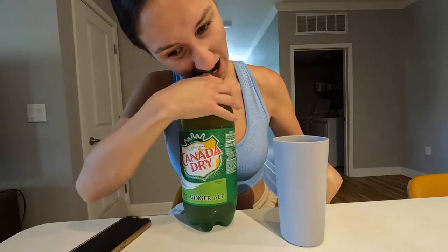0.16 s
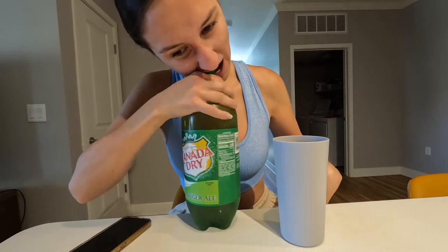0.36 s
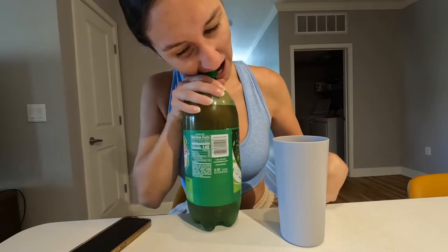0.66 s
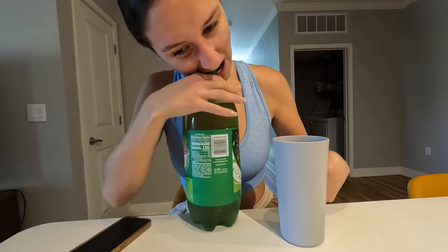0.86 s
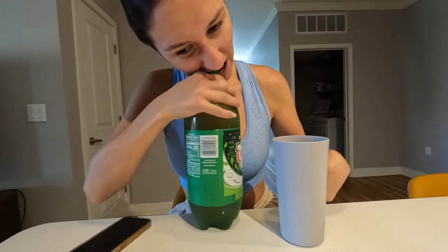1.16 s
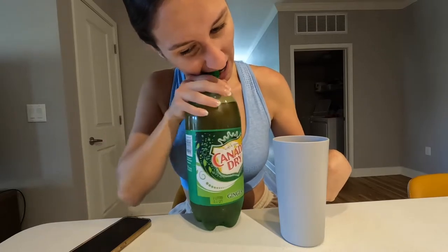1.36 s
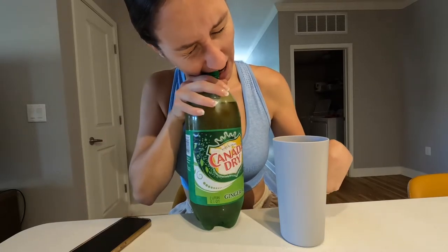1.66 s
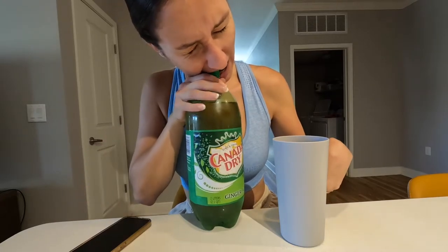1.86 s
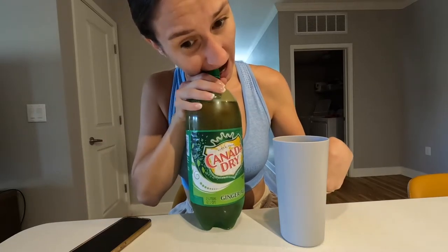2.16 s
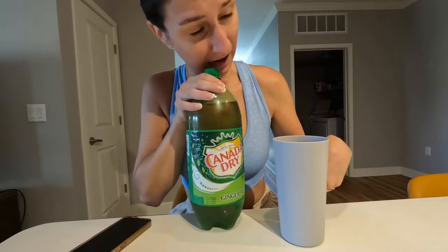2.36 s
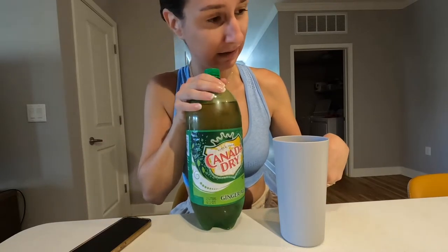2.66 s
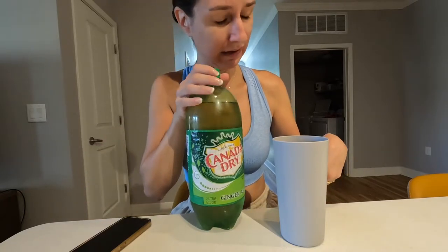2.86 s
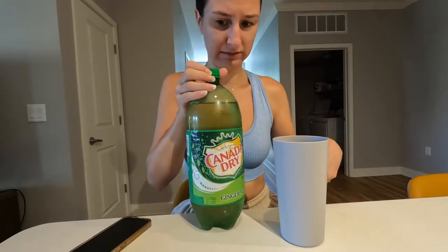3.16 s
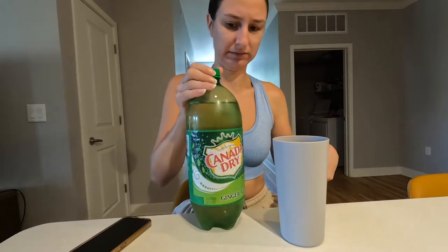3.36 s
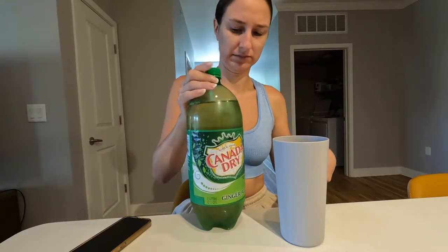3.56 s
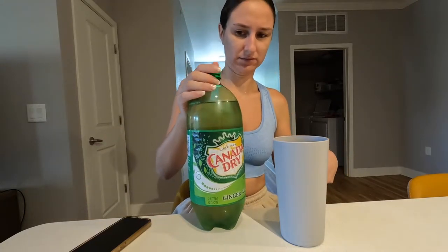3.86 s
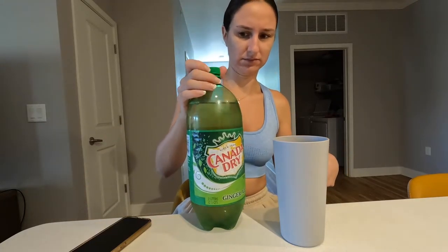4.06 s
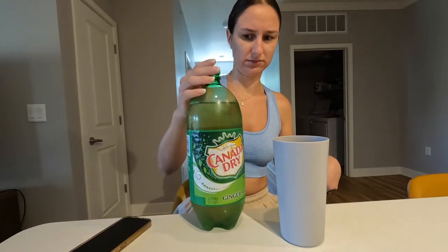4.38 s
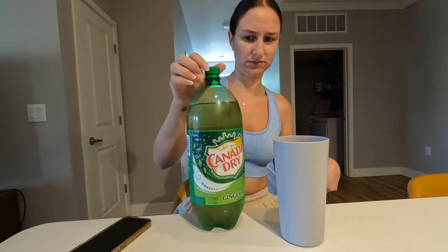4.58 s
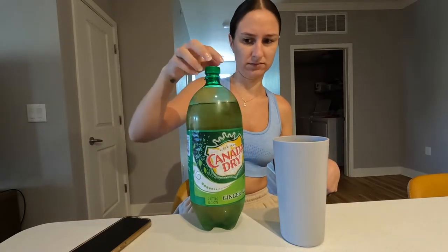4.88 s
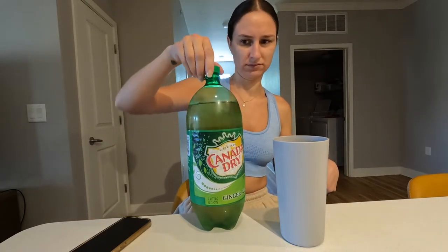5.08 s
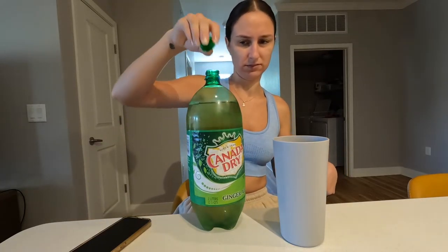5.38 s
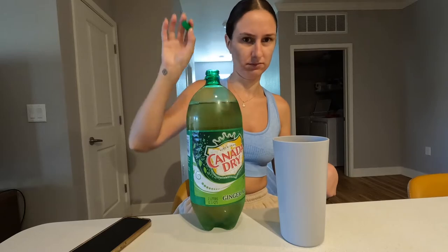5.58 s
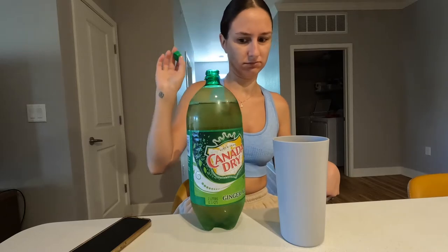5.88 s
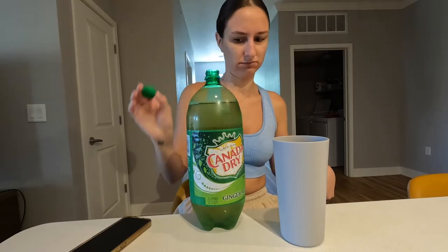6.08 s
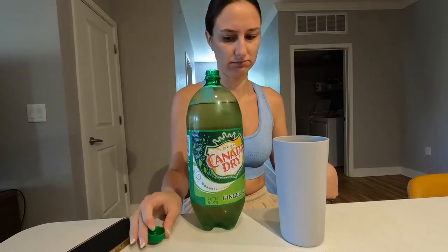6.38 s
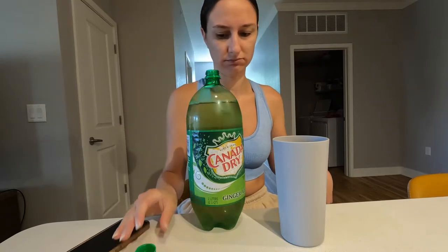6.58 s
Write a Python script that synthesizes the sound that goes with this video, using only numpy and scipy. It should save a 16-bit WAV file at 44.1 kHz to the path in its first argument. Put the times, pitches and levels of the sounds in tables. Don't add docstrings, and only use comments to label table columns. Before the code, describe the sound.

A plastic soda bottle cap cracks and gas hisses out in a loud bright burst, then a small puff, cap clicks and a table tap.

```python
import sys
import numpy as np
from scipy import signal
from scipy.fft import rfft, irfft
from scipy.io import wavfile
from scipy.ndimage import uniform_filter1d

SR = 44100
rng = np.random.default_rng(int(sys.argv[2]) if len(sys.argv) > 2 else 0)


def voltage_ratio(decibels):
    exponent = np.asarray(decibels, float) / 20
    return 10 ** exponent


def file_out(sig):
    cols = np.atleast_2d(sig).T
    lim = np.clip(cols, -1, 1)
    pcm = np.round(lim * 32767).astype(np.int16)
    wavfile.write(sys.argv[1], SR, pcm)


N = 296793


def unit(x):
    return x / np.sqrt(np.mean(x ** 2))


def noise():
    return rng.standard_normal(N)


def band(x, hz, width):
    return signal.lfilter(*signal.iirpeak(min(hz, .45 * SR), hz / width, fs=SR), x)


def steep_band(x, hz, width):
    return band(band(x, hz, width), hz, 2 * width)


def body(x, modes):
    out = np.zeros(N)
    for k, (hz, width, db) in enumerate(modes):
        out += (-1) ** k * voltage_ratio(db) * unit(steep_band(x, hz, width))
    return unit(out)


def colour(x, table):
    hz, db = np.transpose(table)
    f = np.maximum(np.arange(len(x) // 2 + 1) * SR / len(x), 1)
    return irfft(rfft(x) * voltage_ratio(np.interp(np.log(f), np.log(hz), db)), len(x))


def walk(rate):
    k = int(SR / rate)
    held = np.repeat(rng.standard_normal(N // k + 1), k)
    return unit(uniform_filter1d(uniform_filter1d(held, k), k)[:N])


def curves(*tables):
    t = np.arange(N) / SR
    s, *columns = np.vstack(tables).T
    on = sum((t >= rows[0][0]) & (t <= rows[-1][0]) for rows in tables)
    first, *rest = (np.interp(t, s, c) for c in columns)
    return [voltage_ratio(first) * uniform_filter1d(1. * on, size=200)] + rest


def swell(s, rise, fall, db):
    out = np.zeros(N)
    i = np.arange(max(int((s - 2 * rise) * SR), 0), min(int((s + 2 * fall) * SR), N))
    distance = np.maximum((s - i / SR) / rise, (i / SR - s) / fall)
    out[i] = voltage_ratio(db - 18.5 * distance)
    return out


def ring(hz, t60, burst_s, seed):
    t = np.arange(len(seed)) / SR
    contact = np.exp(-t / burst_s) * (seed + 1.4 * (t == 0))
    x = band(band(contact, hz, np.log(1000) / (np.pi * t60)), hz, 0.59 * hz)
    if hz < SR / 8:
        x = signal.lfilter([1, 2, 1], [1], x)
    return x / np.abs(x).max()


def add(out, s, x):
    i = int((s + 0.00043) * SR)
    out[i:i + len(x)] += x[:N - i]


# f/Hz, level/dB
RUMBLE = [(12, -15), (20, 7.5), (33, -16.5), (54, -9.5), (107, -11.5), (133, -7), (169, -12.5), (246, -8),
          (367, -15.5), (464, -22.5), (536, -25), (1500, -44.5), (1950, -51.5), (3300, -120)]
# f/Hz, level/dB
RUMBLE_SIDE = [(12, -33), (20, 16.5), (70, -17), (131, -13), (398, 1.5), (619, -9.5), (673, -8.5),
               (840, -9), (5360, -20), (11600, -44.5), (14900, -51)]
# f/Hz, level/dB
AIR_HISS = [(800, -8), (1100, 4.5), (3800, 0.5), (4500, -2), (7650, -8), (8050, -16.5), (11000, -23.5),
            (13000, -37), (14800, -57)]
# f/Hz, width/Hz, level/dB
ROOM_MODES = [(23.8, 10, -36), (142.4, 17.2, -39), (223, 30.4, -39.5), (1050, 190, -59.5)]


def ventilation():
    mid = voltage_ratio(-32) * unit(colour(noise(), RUMBLE))
    mid = mid + voltage_ratio(-53.5) * unit(colour(noise(), AIR_HISS))
    for hz, width, db in ROOM_MODES:
        mid = mid + voltage_ratio(db) * unit(steep_band(noise(), hz, width))
    off_centre = voltage_ratio(-20) * band(mid, 650, 400)
    return mid, off_centre + voltage_ratio(-53) * unit(colour(noise(), RUMBLE_SIDE))


# f/Hz, width/Hz, level/dB
LABEL_MODES = [(2070, 400, 1.5), (3330, 380, 5.5), (4870, 900, -2), (6770, 1700, 7), (9930, 1400, -2.5),
               (12500, 2500, -5)]
# t/s when loudest, rise/s, fall/s, level/dB
PALM_STROKES = [(0.005, .005, .03, -54), (.12, 0.064, .1, -64), (.246, .03, .03, -59), (.18, .06, .06, -64),
                (.56, .02, .1, -51), (.6, .04, 0.1, -43), (.645, 0.11, 0.061, -42), (.81, .06, 0.032, -57),
                (.9, .1, .1, -61), (6.41, .03, 0.11, -62)]


def palm():
    slips = noise() * voltage_ratio(0.64 * walk(400))
    gain = np.max([swell(*row) for row in PALM_STROKES], axis=0)
    return gain * body(slips, LABEL_MODES)


# t/s, peak level/dB, f/Hz, length/s, treble above it/dB
GRIP_TICKS = [
    (0.242, -39, 4630, 0.0012, -23),
    (0.821, -38.5, 7000, 0.00093, -28),
    (2.7432, -46, 6170, 0.0012, -7),
    (2.7716, -50, 5560, 0.0012, -4),
    (2.889, -37, 5520, 0.0041, -22),
    (2.958, -48, 4250, 0.0012, -8),
    (4.1194, -51, 4260, 0.0012, -10),
]
# t/s, peak level/dB, f/Hz, length/s, treble above it/dB
TOUCHDOWN = [
    (6.3814, -50, 7900, 0.003, -6),
    (6.5415, -48, 7100, 0.003, -9),
    (6.5484, -47, 7350, 0.003, -8),
    (6.571, -36.5, 7190, 0.0034, -8),
    (6.6033, -40, 7200, 0.004, -12),
    (6.609, -42.5, 7190, 0.004, -3),
    (6.617, -46, 7180, 0.003, -4),
]


def ticks():
    out, rows = np.zeros(N), GRIP_TICKS + TOUCHDOWN
    seeds = rng.standard_normal((len(rows), 3, 2048))
    for (s, db, hz, length, treble_db), seed in zip(rows, seeds):
        edge = ring(9900, .002, length, seed[1]) + .5 * ring(13000, .0015, length, seed[2])
        add(out, s, voltage_ratio(db) * (ring(hz, 0.0049, length, seed[0]) + voltage_ratio(treble_db) * edge))
    return out


# t/s, rim peak/dB, shell above rim/dB, rim f/Hz, crack above rim less 10.5/dB
HARD_KNOCKS = [
    (0.5475, -39, -13, 4680, -12),
    (0.5945, -37, -10, 3110, -15),
    (1.3066, -19.5, -11, 3340, -18),
    (2.2577, -21.5, -25, 3800, -12),
    (3.461, -23, -3.5, 3400, -11),
    (3.5728, -29, -18, 3380, -17),
    (4.6645, -25.5, -1, 4400, -15),
    (4.784, -20.5, -11.5, 3220, -17.5),
    (5.3054, -41, -2, 3700, -15),
]
# t/s, rim peak/dB, shell f/Hz, shell above rim/dB, rim f/Hz
SOFT_KNOCKS = [(3.6318, -33, 1650, 5, 3500), (3.6557, -37.5, 1720, 11.5, 4040),
               (3.7254, -55, 1440, 13, 3650), (3.784, -38, 1530, 1, 3090), (3.8694, -37, 1340, -12, 3640),
               (3.8894, -43, 2000, 13, 3510), (3.908, -25.5, 1890, -25, 3460), (3.9804, -42, 1770, 1, 3330),
               (4.0023, -35.5, 1800, 2, 3400), (4.019, -36.5, 1700, 7, 3760),
               (4.3779, -40.5, 1530, 7, 3070), (4.427, -34, 1480, 2, 2850), (4.4782, -38.5, 1390, 0, 2930),
               (4.526, -29, 2000, 4.5, 3920), (4.6873, -39, 1890, -10, 3420),
               (4.7152, -27, 1150, -14, 2800), (4.7257, -40.5, 1760, 12.5, 3460),
               (4.7596, -39, 1450, 2, 3570), (5.054, -43, 1450, 0, 3670), (5.0628, -30.5, 1850, -3, 3420),
               (5.1492, -42, 1290, 0, 3680), (5.3214, -53.5, 1050, -10, 2750),
               (6.5819, -35, 1040, -22, 4660)]


def knocks():
    rows = [(s, db, 2065, *rest) for s, db, *rest in HARD_KNOCKS]
    rows += [(*row, -30) for row in SOFT_KNOCKS]
    out, seeds = np.zeros(N), rng.standard_normal((len(rows), 5, 2048))
    for (s, db, shell_hz, shell_db, rim_hz, crack_db), seed in zip(rows, seeds):
        crack = ring(6070, 0.00078, 0.0015, seed[0]) + 0.17 * ring(11500, 0.00035, 0.00027, seed[3])
        snap = 0.99 * ring(3200, 0.0036, 0.00021, seed[3])
        rim = ring(rim_hz, 0.0038, 0.0022, seed[1]) + snap
        thud = 0.71 * ring(1560, 0.002, 0.0042, seed[4])
        shell = ring(shell_hz, 0.013, 0.0011, seed[2]) + thud
        add(out, s, voltage_ratio(db - 1) * (rim + voltage_ratio(shell_db) * shell + voltage_ratio(crack_db + 10.5) * crack))
    return out


# f/Hz, width/Hz, level/dB
CAP_RIM = [(2750, 1000, -5.5), (3400, 390, -5), (3850, 320, -5)]
# f/Hz, width/Hz, level/dB
FREE_RIM = [(2330, 100, 1), (2650, 1400, 4), (3870, 430, -15)]
# f/Hz, width/Hz, level/dB
SHELL_MODES = [(1450, 390, -2.5), (1960, 210, -2)]
# t/s when loudest, fall/s, rim level/dB, treble above it/dB, shell above it/dB
THREAD_SCRAPES = [(3.47, .13, -50, 0.5, -4), (3.55, .09, -56, 0, 2), (3.615, 0.13, -45.5, -4.5, -5),
                  (3.66, 0.06, -47.5, -0.5, -1), (3.74, 0.17, -60, -8, 6), (3.836, .12, -44, -5.5, -2),
                  (3.86, 0.1, -45, -14, 3.5), (3.905, .06, -53, -18, -2), (3.97, 0.17, -53, -24, 0),
                  (4.03, 0.36, -62, -27, 3), (4.37, 0.19, -56.5, -20, 2), (4.44, 0.08, -55, -20, 5),
                  (4.533, 0.024, -42.5, -4, 0), (4.69, .1, -58, 4, 1), (4.73, 0.17, -52, -8, -1),
                  (4.8, .18, -45, -9, -1), (5.045, .08, -57, -18, 0), (5.15, 0.16, -60, -19, 1),
                  (5.318, 0.036, -49, -20, -11), (6.585, 0.026, -56.5, 10.5, -17)]


def spin():
    free_s = 4.76
    slips = noise() * voltage_ratio(4.0 * walk(900))
    on_thread = np.arange(N) < free_s * SR
    rim = np.where(on_thread, body(slips, CAP_RIM), body(slips, FREE_RIM))
    treble = unit(steep_band(slips, 4700, 1700))
    layers = np.array([rim, treble, body(slips, SHELL_MODES)])
    gains = np.zeros((3, N))
    for s, fall, db, treble_db, shell_db in THREAD_SCRAPES:
        balance = voltage_ratio(np.array([0, treble_db, shell_db]))
        gains = np.maximum(gains, np.outer(balance, swell(s, 0.15 * fall, fall, db)))
    grip = voltage_ratio(1.2 * np.array([walk(40) for _ in layers]))
    return np.sum(gains * layers * grip, axis=0)


# t/s, peak level/dB, low f/Hz, its level/dB, high f/Hz, crack level/dB
NECK_POPS = [
    (1.2934, -27.5, 1300, 1, 2080, 10.5),
    (2.2593, -23.5, 1140, -1, 1970, -6),
]


def pops():
    out, seeds = np.zeros(N), rng.standard_normal((len(NECK_POPS), 3, 2048))
    for (s, db, low_hz, low_db, high_hz, crack_db), seed in zip(NECK_POPS, seeds):
        modes = ring(high_hz, 0.0151, 0.00031, seed[0])
        modes = modes + voltage_ratio(low_db) * ring(low_hz, 0.02, 0.00028, seed[1])
        add(out, s, voltage_ratio(db) * (modes + voltage_ratio(crack_db) * ring(5500, 0.0006, 0.00094, seed[2])))
    return out


# f/Hz, width/Hz, level/dB
NECK_MODES = [(2035, 300, 4.5), (3250, 570, 10)]
# f/Hz, width/Hz, level/dB
GAP_MODES = [(4480, 190, 5), (4880, 200, 4), (5330, 240, 2), (5890, 620, 5), (6610, 1340, 2.5),
             (7330, 550, -1), (8500, 880, -3.5)]
# f/Hz, width/Hz, level/dB
WHISTLE_MODES = [(9300, 700, 5.4), (10330, 900, 9.1), (11330, 600, 3.3), (12800, 1200, 3.4)]
# t/s, jet level/dB, spread/dB (a wider gap feeds the other resonances more)
LEAKS = [
    [(1.305, -45, 2), (1.323, -32.5, -1.5), (1.347, -24, 0.5), (1.417, -17.5, -4.5), (1.5, -20, 0.5),
     (1.6, -25.5, 3), (1.65, -28.5, -1), (1.75, -29.5, -1), (1.96, -49, 1)],
    [(1.96, -52, -14), (1.985, -50, 2), (2.03, -46.5, 0), (2.07, -58.5, 2.5), (2.09, -66, -1),
     (2.17, -63, 3)],
    [(2.17, -63, -14), (2.182, -63, 3), (2.214, -36.5, 1), (2.246, -35, 2), (2.265, -37.5, 0),
     (2.302, -44, 2.5), (2.42, -59, 6), (2.546, -72, 5), (2.66, -71.5, -4)],
]
LEAK_BRIGHT_DB = [1.1, 9, 7]


def gas():
    tables = []
    for rows, bright in zip(LEAKS, LEAK_BRIGHT_DB):
        tables.append(np.c_[rows, np.full(len(rows), bright), np.array(rows)[:, 1]])
    gain, spread_db, bright_db, flow_db = curves(*tables)
    over_db = flow_db + 19
    neck_db = -5.5 + spread_db - bright_db
    bloom_db = -3.5 + .15 * over_db
    whistle_db = -7 + 1.1 * spread_db + bright_db + 0.16 * over_db
    rush_db = -8.5 + 1.5 * spread_db - 0.15 * over_db

    jet = noise() * voltage_ratio(0.5 * walk(220))
    groups = [(NECK_MODES, neck_db), (GAP_MODES[:2], -2), (GAP_MODES[2:5], bloom_db),
              (GAP_MODES[5:], -4.5 + .4 * spread_db), (WHISTLE_MODES, whistle_db)]
    tones = np.zeros(N)
    for modes, db in groups:
        tones += voltage_ratio(db + 1.4 * walk(12.12)) * body(jet, modes)
    rush = unit(band(band(noise(), 3200, 3500), 3420, 12000))
    headspace = body(jet, [(1240, 146, 0)])
    sung = (gain / gain.max()) ** 0.36 * voltage_ratio(-9.5 + neck_db) * headspace
    return gain * (tones + sung + voltage_ratio(rush_db) * rush)


# f/Hz, level/dB
PORT_DIFFERENCE = [(500, -7), (1260, -17.5), (2500, -12), (3600, -14), (4500, -43), (13000, -38)]
# f/Hz, level/dB
BODY_SHADOW = [(900, -29), (2500, -13), (3800, -10), (4500, -36), (11500, -14), (12500, -6)]


def scene():
    taps = knocks() + ticks()
    taps = taps + voltage_ratio(-12.5) * np.roll(taps, int(.0008 * SR))
    near = gas() + palm() + spin() + pops() + taps

    t60_s, room_db = 0.58, -12
    t = np.arange(SR // 2) / SR
    tails = rng.standard_normal((2, len(t))) * np.exp(-np.log(1000) * t / t60_s) * (t > .004)
    tails = signal.lfilter([.5], [1, -.5], tails)
    wet = [voltage_ratio(room_db) * signal.fftconvolve(near, h / np.sqrt(np.sum(h ** 2)))[:N] for h in tails]

    skew = voltage_ratio(-20) * band(0.56 * np.roll(near, 3) - near, 2200, 1740)
    skew = skew + voltage_ratio(-11) * band(np.roll(taps, 9), 7500, 7000)
    skew = skew + voltage_ratio(10.5) * colour(wet[1], PORT_DIFFERENCE)
    skew = skew + colour(np.roll(near, int(.0011 * SR)), BODY_SHADOW)

    mid, side = ventilation()
    mid, side = mid + near + wet[0], side + skew
    return np.array([mid + side, mid - side])


def top_cut(x):
    return signal.sosfilt(signal.butter(12, 15090, fs=SR, output="sos"), x)


def record(dry):
    dry = signal.sosfilt(signal.butter(4, 13000, fs=SR, output="sos"), dry)
    dry = signal.sosfilt(signal.cheby1(8, .5, 14550, fs=SR, output="sos"), dry)
    power = uniform_filter1d(np.mean(dry ** 2, axis=0), size=2000)
    lag = np.exp(-1 / (.3 * SR))
    held = signal.lfilter([1 - lag], [1, -lag], power, zi=[voltage_ratio(-84.5)])[0]
    gain = np.minimum(1, voltage_ratio(-59.5) / held) ** 0.2
    dropout_s, length_s, dropout_db = 4.511, .003, -14
    hiccup = voltage_ratio(dropout_db * np.exp(-((np.arange(N) / SR - dropout_s) / length_s) ** 2))
    return top_cut(dry * gain * hiccup)


dry = scene()
out = record(dry)
file_out(out)
```